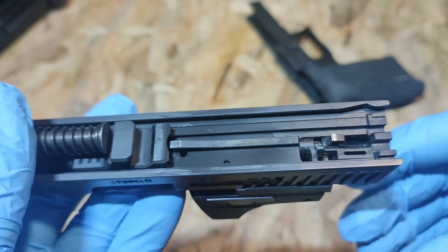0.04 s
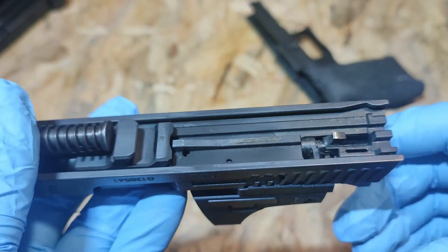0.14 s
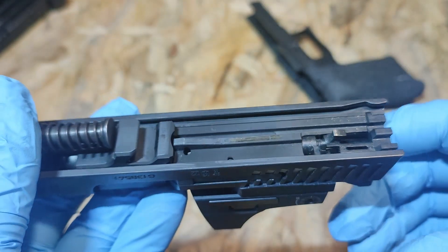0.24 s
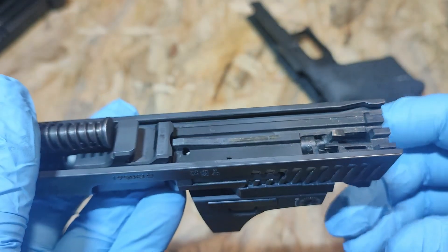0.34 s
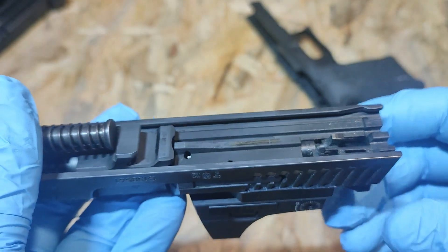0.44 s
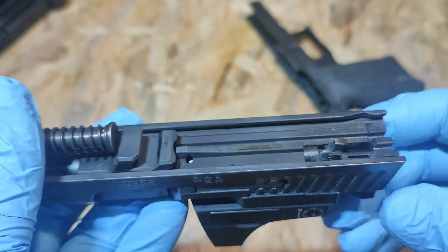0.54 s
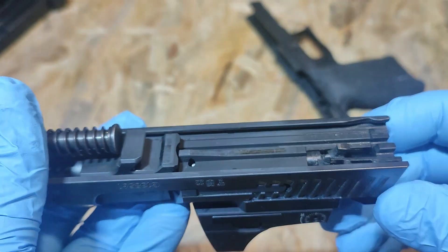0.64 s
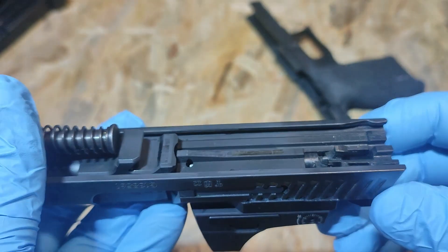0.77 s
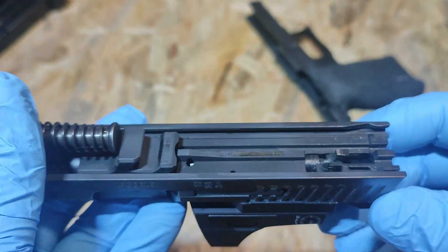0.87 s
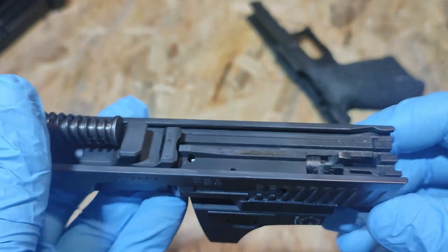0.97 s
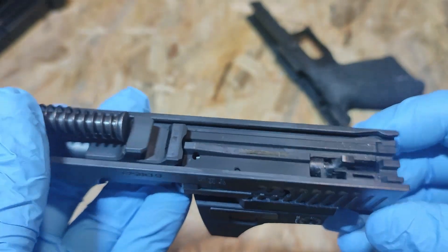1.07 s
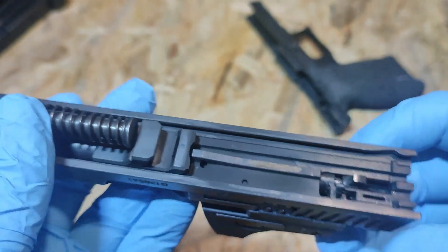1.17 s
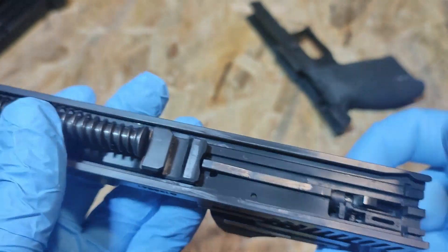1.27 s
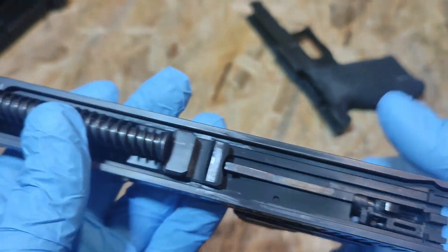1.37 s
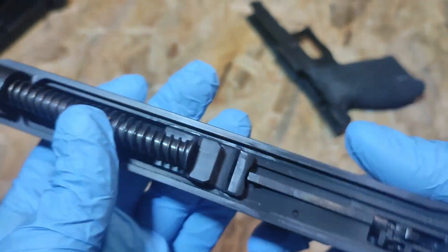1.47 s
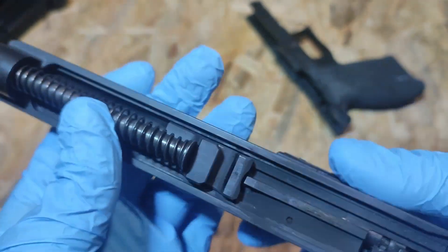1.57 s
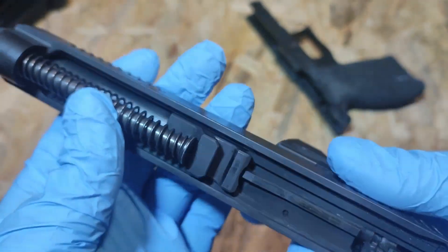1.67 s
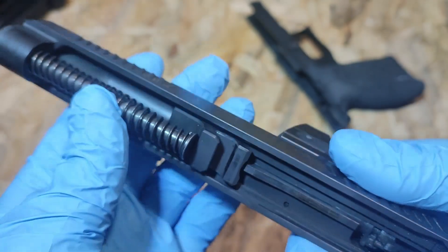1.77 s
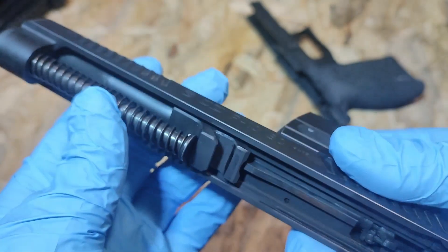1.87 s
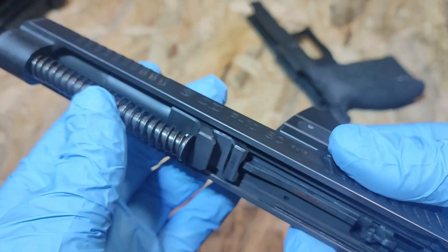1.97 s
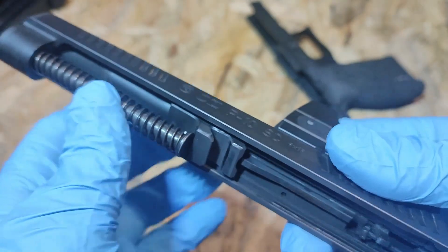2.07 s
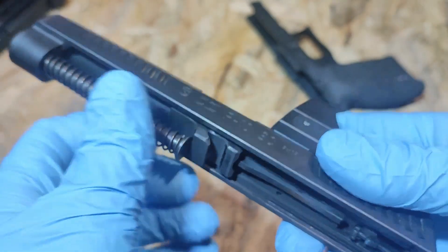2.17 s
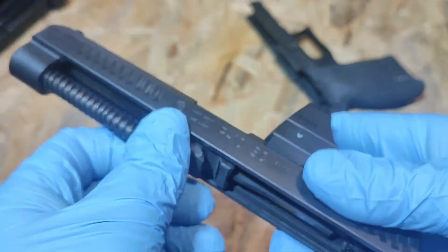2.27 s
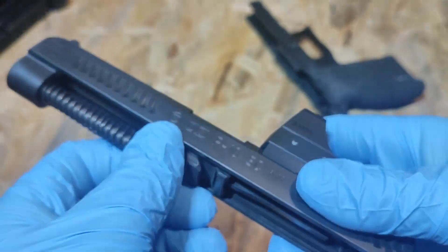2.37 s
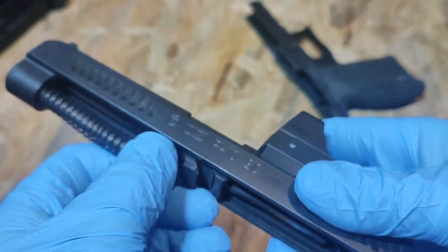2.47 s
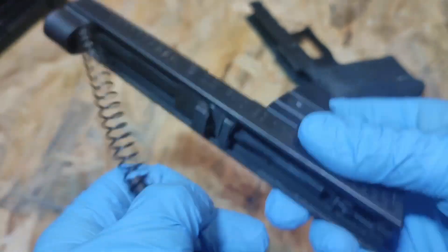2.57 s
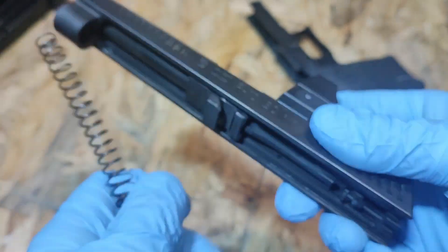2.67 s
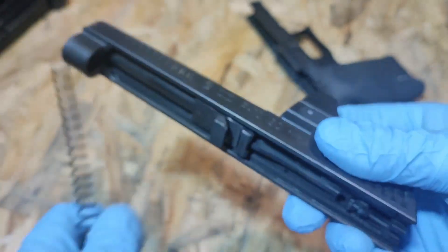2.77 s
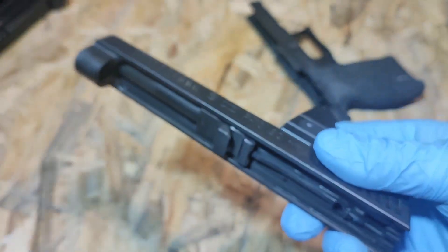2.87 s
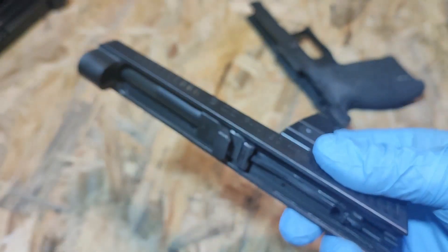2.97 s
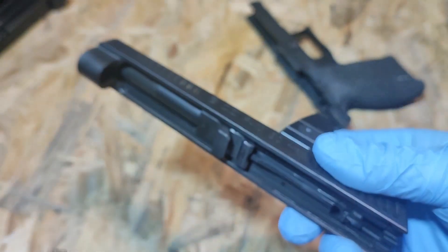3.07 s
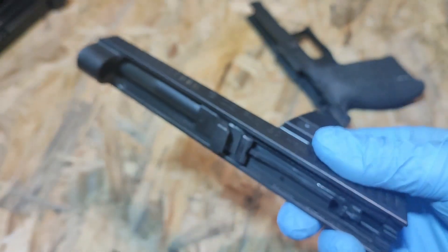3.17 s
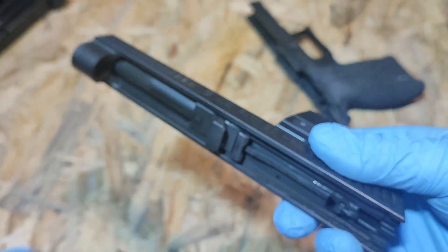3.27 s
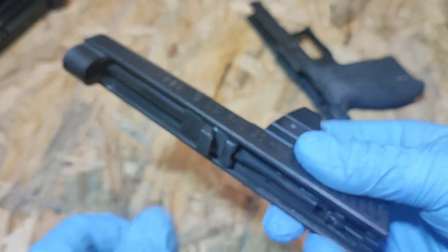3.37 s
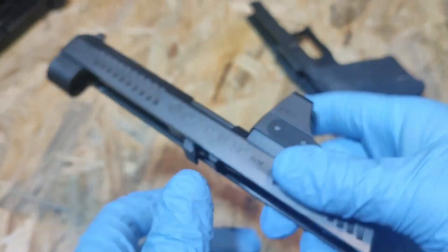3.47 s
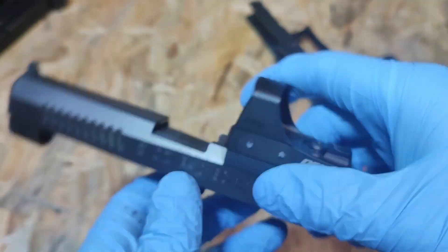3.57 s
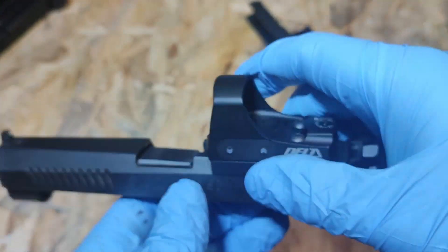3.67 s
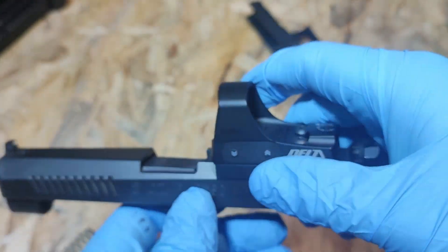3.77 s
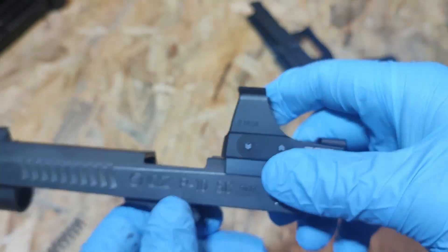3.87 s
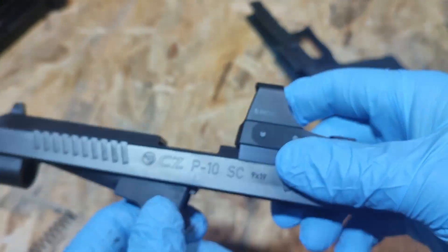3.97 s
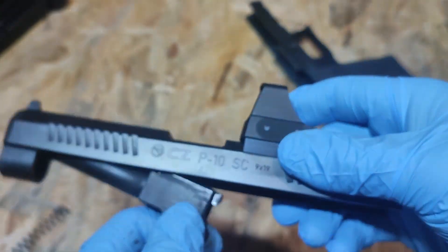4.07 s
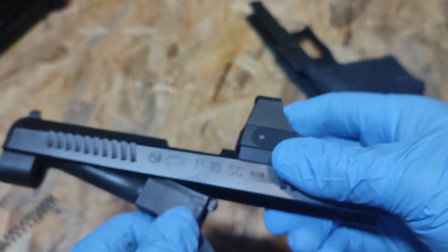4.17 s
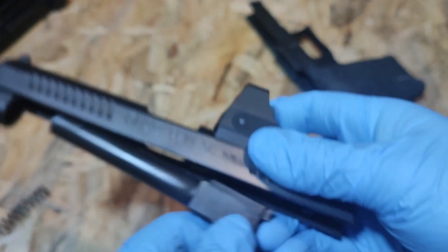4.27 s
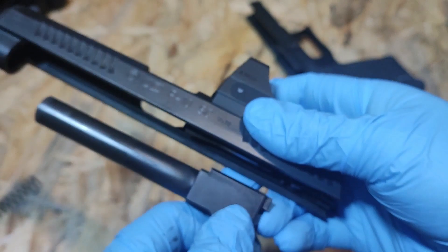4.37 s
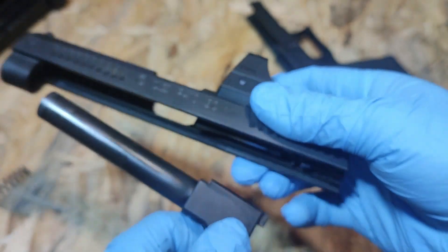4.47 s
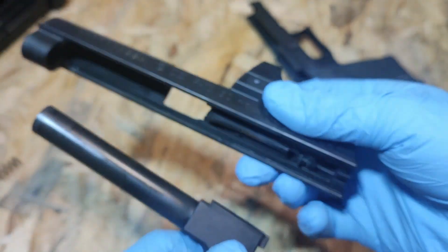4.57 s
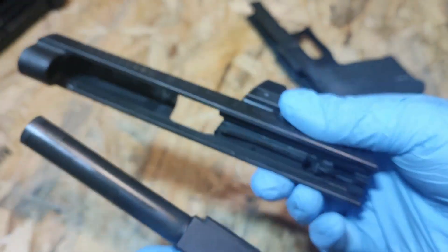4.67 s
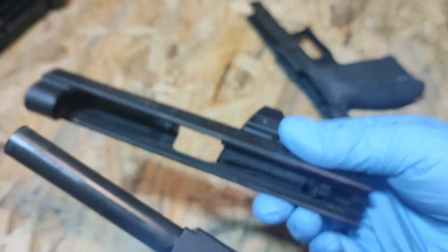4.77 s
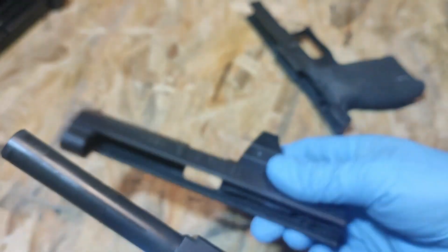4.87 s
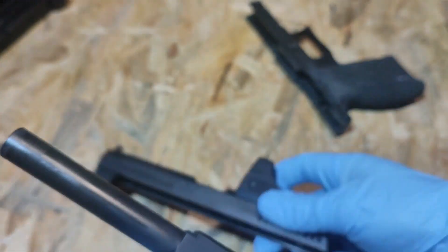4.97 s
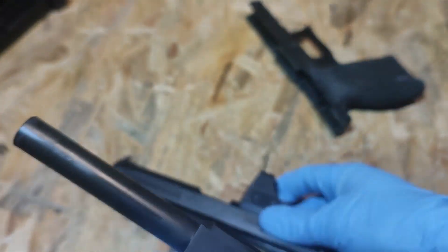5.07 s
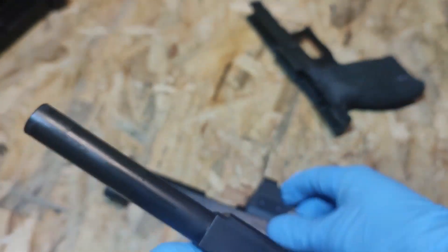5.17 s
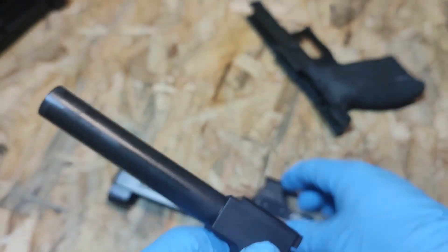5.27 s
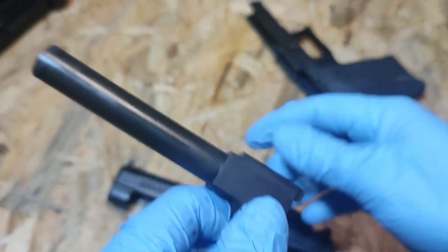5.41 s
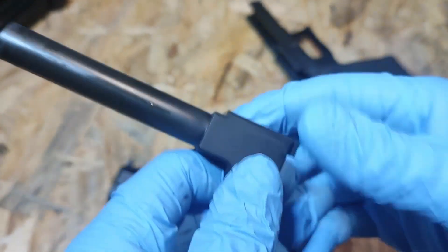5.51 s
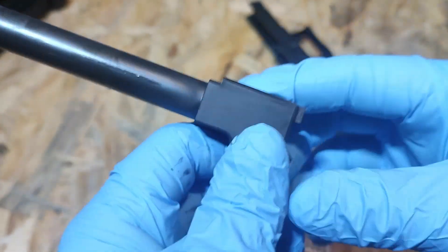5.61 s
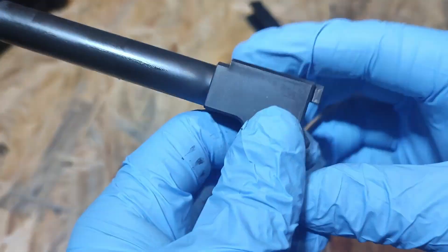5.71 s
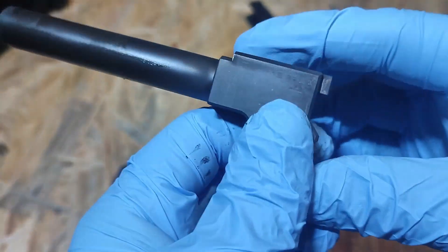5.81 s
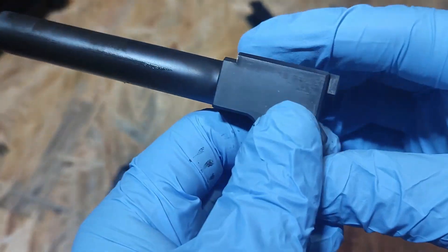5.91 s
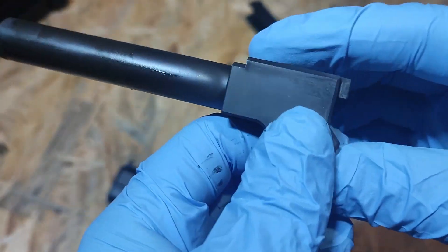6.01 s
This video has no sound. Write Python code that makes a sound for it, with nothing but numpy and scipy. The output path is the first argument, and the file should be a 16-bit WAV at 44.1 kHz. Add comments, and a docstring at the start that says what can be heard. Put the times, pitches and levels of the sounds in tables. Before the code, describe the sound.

Close stereo microphones in a small workshop with a low fan hum. Gloves rub faintly on steel; a spring snaps sharply with a deep thump, then a rod drops and bounces on a wooden board. A bright clink, small ticks and another clink follow as a tube is drawn out, cloth rustling softly. Finally a heavy metal part lands on the board with loud dull knocks and a brighter double knock.

```python
"""In a small workshop with a low steady hum, gloved hands strip a pistol slide close to two microphones.
The recoil spring snaps out and its rod is dropped on a chipboard bench; the barrel scrapes and clinks out of
the slide, and the slide is laid down with heavy knocks. Gloves rub on the steel and a sleeve rustles.
Blows are chattering noise bursts plus damped modes, each with a room echo; rubbing, scrape, rattle, rustle
and hum are coloured noise, the hum with a few wavering tones."""
import sys
import numpy as np
from scipy import signal
from scipy.fft import rfft, irfft, next_fast_len
from scipy.io import wavfile
from scipy.ndimage import uniform_filter1d, map_coordinates

SR = 44100
rng = np.random.default_rng(int(sys.argv[2]) if len(sys.argv) > 2 else 0)


def int16_out(signal):
    """Quantize to a 16-bit WAV file."""
    q = np.round(np.clip(np.atleast_2d(signal).T, -1, 1) * 32767)
    wavfile.write(sys.argv[1], SR, q.astype(np.int16))


N = 266522
AGE = np.arange(SR // 2) / SR  # time since a blow, s
TIME = np.arange(N) / SR

# The spring slips and snaps against the slide. Each row: start in seconds, level in dB, chatter t60 in seconds,
# brightness in dB per octave, spring ring in dB re the contact, left over right in dB.
SPRING_SNAPS = [(0.810, -43.5, 0.014, 1, -16, 3), (2.4287, -18, 0.031, 0, -8, -5),
                (2.5351, -29.5, .04, -1, -8, 7.5), (2.544, -20.5, .09, 0, -10, -2),
                (2.549, -18, .04, 2.5, -28, 7.5)]
# The barrel knocks inside the slide. Each row: start in seconds, level in dB, brightness in dB per octave,
# rings of slide, barrel and rails in dB re the contact, rebound in dB re the knock.
BARREL_CLINKS = [(2.382, -44, -1, -18, -20, -14, -25), (3.6196, -21, 9.5, -4, -45, -23, -12),
                 (3.707, -48, -1, -12, -21, -16, -10), (3.913, -40.5, 6, -12, 6, -10, -2),
                 (3.996, -50, 1, -8, 0.5, -14, -1), (4.068, -39.5, 3.5, -17, -24, -16, -1),
                 (4.228, -49, 1, -2, -8, -22, -5), (4.276, -21.5, -.5, -30, -7, -25, -8),
                 (4.328, -34.5, 6, -17, -1, 3.5, -18)]
# The slide lands on the bench. Each row: start in seconds, level in dB, brightness in dB per octave,
# loss a bounce in dB.
SLIDE_DROPS = [(5.057, -10.5, -6.5, 10.5), (5.222, -46, -13, 8.5), (5.324, -13, -.5, 30),
               (5.339, -16, 3, 32)]
# A glove grabs or lets go abruptly; at 5.059 loose steel rattles in the slide as it lands.
# Each row: loudest moment in seconds, level in dB, brightness in dB per octave.
GRIPS_AND_RATTLE = [(3.05, -47, -4), (3.168, -43.5, 1), (4.458, -52, 3), (4.673, -52, -4.5),
                    (4.805, -49, -4), (5.059, -40.5, -2.5)]
# A glove slides along the steel; at 3.607 the barrel scrapes just before its hard knock.
# Each row: loudest moment in seconds, level in dB, brightness in dB per octave.
STROKES_AND_SCRAPE = [(1.31, -66, 4), (1.53, -55.5, 6.5), (2.15, -62, 5.5), (2.235, -53, -0.5),
                      (2.665, -54.5, 2.5), (3.205, -48, 0), (3.478, -60, 5), (3.607, -57, -1),
                      (3.889, -62, 7), (4.06, -56, 2), (5.297, -55, 4)]

# Ringing modes of each part. Each row: frequency in Hz, typical strength in dB, t60 in seconds.
SPRING_MODES = [(3010, -6, .08), (3400, 1.5, 0.1), (3500, -0.5, .09), (4390, 4, 0.073), (5340, -3, .06),
                (5380, -1, 0.04), (7060, 1, 0.066), (7600, -5.5, 0.1), (8450, -7, .07),
                (10000, -12.5, 0.066), (10590, -8, 0.098), (12250, -9, .085), (13360, -4.5, 0.066)]
SLIDE_MODES = [(3180, -4, 0.072), (3760, -18, 0.02), (4430, 0, 0.096), (5130, 5, 0.075), (5200, -6, 0.07),
               (5620, -3.5, 0.067), (7240, -4, 0.086), (6850, -15, 0.091), (8410, -9, 0.065),
               (9130, -15, .07), (11400, -18, 0.079), (13360, -6, 0.12), (13600, -8, 0.087)]
BARREL_MODES = [(4363, -5, 0.25), (4340, -11, 0.14), (5140, -19, 0.044), (8700, -20, 0.09)]
RAIL_MODES = [(2930, 0, 0.093), (5020, -10, .04), (13650, -18, 0.073)]
ROD_MODES = [(5150, -6.5, 0.09), (10550, -3.5, 0.13)]
BOARD_MODES = [(69.45, -22, 0.5), (153.5, -4, 0.13), (167.9, 8, .13), (202, -6.5, 0.023),
               (271.8, -12, 0.33), (317.5, -12.5, .19), (423.7, -17, 0.22), (579, -7.5, 0.1),
               (739, -13, 0.038), (904, -16.5, .11), (1007, -16.5, 0.095), (1045, -19.5, 0.16)]

# Colours of the contacts and noises. Each row: frequency in Hz, relative density in dB per Hz.
SNAP_COLOUR = [(200, -16), (900, -18.5), (1700, -10), (2300, -10), (3300, -1), (4500, -0.5), (6200, -10),
               (7400, -2.5), (8600, -5.5), (9800, -13), (10700, -10), (12000, -13), (13500, -5.5),
               (15000, -22)]
CLINK_COLOUR = [(200, -23.5), (700, -26), (1050, -13.5), (1700, 0.5), (2400, -5), (3100, 1), (3550, 0),
                (3850, -2.5), (4700, -10), (6200, -16), (7300, -14.5), (8800, -20.5), (9700, -30.5),
                (11500, -26), (12700, -31), (13800, -23.5)]
ROD_KNOCK_COLOUR = [(50, -22), (150, -3), (280, 4), (380, -6.5), (500, -15), (780, -12.5), (1000, -1.5),
                    (1300, -2), (1800, -6), (3200, -8.5), (4100, -28.5), (5300, -20), (8500, -32),
                    (14000, -39.5)]
SLIDE_KNOCK_COLOUR = [(40, -26.5), (100, -6.5), (170, 7.5), (280, 3), (450, -1.5), (900, 3), (1500, -7),
                      (2400, -8), (3700, -21.5), (6800, -28), (10000, -44), (14000, -53)]
RUB_COLOUR = [(200, -8), (1000, -1.5), (3000, 1), (7500, 1.5), (10000, -10), (13500, -4), (15000, -10.5)]
SLEEVE_COLOUR = [(50, -19), (110, -15.5), (165, -1), (300, -4), (600, -16.5), (1200, -21.5), (3000, -31),
                 (8000, -52)]
HUM_COLOUR = [(12, -31.5), (20, 2), (33, -13.5), (66, -8.5), (105, -1), (143, -9), (263, -18), (409, -14),
              (540, -22), (865, -19.5), (1170, -25), (3090, -30), (4200, -37), (13400, -46.5),
              (15000, -52.5)]

# Wavering tones in the hum. Each row: frequency in Hz, level in dB.
HUM_LINES = [(97, -74.5), (350, -80), (409, -79), (888, -83.5), (1077, -82.5)]
# Likeness of diffuse sound at the two microphones. Each row: frequency in Hz, correlation from 0 to 1.
ALIKE = [(60, 0.65), (130, 1), (290, 0.47), (630, 0.59), (1390, 0.09), (6700, 0.01)]
# Decay of the workshop's echo. Each row: frequency in Hz, t60 in seconds.
ROOM = [(100, 0.34), (400, 0.24), (1500, 0.15), (6000, 0.12), (14000, 0.16)]

SHRINK = .53  # every bounce flies this share of the one before
TIP_LEAD_S, TIP_DB = .003, -20  # an edge touches just ahead of each blow of spring and rod; dB re that blow
COIL_S, COIL_DB, COIL_FLIGHT_S, COIL_LOSS_DB = 2.6896, -40, .04, 8  # start, level, first flight, loss a bounce
CLINK_T60_S, REBOUND_T60_S = .04, .065  # chatter after a knock and after its rebound
REBOUND_S, REBOUND_TILT = .012, -2.5  # crossing to the opposite wall; brightness there, dB per octave
ROD_S, ROD_DB, ROD_FLIGHT_S, ROD_LOSS_DB = 3.2273, -14.3, .0644, 6.3  # start, level, first flight, loss a bounce
ROD_SETTLING_DB = 2  # extra loss, times k * (k - 1) at bounce k
ROD_CHATTER_S, ROD_CHATTER_GROWS = 0.027, 2  # t60 of the first contact; factor for each later one
SLIDE_FLIGHT_S, SLIDE_DULLING = .044, 3.5  # first flight; brightness lost a bounce, dB per octave
BOARD_DB, BOARD_PER_DB = -7, -.6  # ring of the board; duller blows ring it more (dB per dB per octave)
GRIP_RISE_S, GRIP_FADE_S = .0025, 0.13  # time constant of the rise, t60 of the fade
STROKE_RISE_S, STROKE_FADE_S = .033, 0.16  # likewise
FIDGET_DB, FIDGET_SWING_DB = -79, 3.5  # faint rubbing of the fingers all along
ARM_FROM_S, ARM_TO_S, ARM_DB = 3.95, 4.7, -58.5  # the sleeve rustles while the arm draws out the barrel
ARM_RISE_DB_PER_S, ARM_FALL_DB_PER_S = 13, 36
TOP_HZ = 14250  # upper band limit


def spring():
    """The compressed spring slips off its seat and rattles along the slide; its slack end ticks to rest."""
    out = np.zeros((2, N))
    for s, db, t60, tilt, ring_db, pan_db in SPRING_SNAPS:
        edge = contact(SNAP_COLOUR, t60=.016, tilt=-2.5, crack_db=-17.5, rise=.0008)
        add(out, s - TIP_LEAD_S, amp(db + TIP_DB) * edge, room_db=-21.5)
        snap = contact(SNAP_COLOUR, t60, tilt, crack_db=-18.0, rise=.0008)
        snap += amp(ring_db) * ring(SPRING_MODES, spread=4.4)
        add(out, s, amp(db) * snap, room_db=-21.5, pan_db=pan_db)
    for _, s, db in bounces(COIL_S, COIL_DB, COIL_FLIGHT_S, COIL_LOSS_DB, count=4):
        tick = contact(SNAP_COLOUR, t60=0.018, tilt=11.5, crack_db=-15.0, rise=.0008)
        tick += amp(-17) * ring(SPRING_MODES, spread=3.0)
        add(out, s, amp(db) * tick, room_db=-17, pan_db=0.5)
    return out


def barrel():
    """The barrel strikes one wall and rebounds on the other; barrel, slide and its thin rails ring."""
    out = np.zeros((2, N))
    for s, db, tilt, slide_db, barrel_db, rail_db, rebound_db in BARREL_CLINKS:
        clink = contact(CLINK_COLOUR, CLINK_T60_S, tilt, crack_db=-19.0, rise=0.0011)
        for modes, ring_db in (SLIDE_MODES, slide_db), (BARREL_MODES, barrel_db), (RAIL_MODES, rail_db):
            clink += amp(ring_db) * ring(modes, spread=0.87)
        add(out, s, amp(db) * clink, room_db=-19.5, pan_db=2.5)
        rebound = contact(CLINK_COLOUR, REBOUND_T60_S, REBOUND_TILT, crack_db=-22.5, rise=0.00092)
        for modes, ring_db in (SLIDE_MODES, -4), (RAIL_MODES, -14):
            rebound += amp(ring_db) * ring(modes, spread=1.0)
        add(out, s + REBOUND_S, amp(db + rebound_db) * rebound, room_db=-18, pan_db=-3.5)
    return out


def bench():
    """The light rod bounces on the board; the heavy slide lands on one end, rocks, then falls flat."""
    out = np.zeros((2, N))
    for k, s, db in bounces(ROD_S, ROD_DB, ROD_FLIGHT_S, ROD_LOSS_DB, count=3):
        db = db - ROD_SETTLING_DB * k * (k - 1)
        tip = contact(ROD_KNOCK_COLOUR, t60=0.018, tilt=-1, crack_db=-1.5, rise=.0003)
        add(out, s - TIP_LEAD_S, amp(db + TIP_DB) * tip, room_db=-14.5)
        chatter_s = ROD_CHATTER_S * ROD_CHATTER_GROWS ** k
        knock = contact(ROD_KNOCK_COLOUR, chatter_s, tilt=-.6, crack_db=-2, rise=0.00015)
        knock += amp(-18) * ring(BOARD_MODES, spread=.8)
        knock += amp(-27) * ring(ROD_MODES, spread=.9)
        add(out, s, amp(db) * knock, room_db=-14.5)
    for start, first_db, tilt, loss_db in SLIDE_DROPS:
        for k, s, db in bounces(start, first_db, SLIDE_FLIGHT_S, loss_db, count=3):
            bright = tilt - SLIDE_DULLING * k
            knock = contact(SLIDE_KNOCK_COLOUR, t60=0.059, tilt=bright, crack_db=-4, rise=0.00017)
            knock += amp(BOARD_DB + BOARD_PER_DB * bright) * ring(BOARD_MODES, spread=.8)
            add(out, s, amp(db) * knock, room_db=-14.5)
    return out


def thump():
    """A deep push and, a tenth of a second later, its softer return in the left microphone only."""
    def push(s, rise, life):
        """A pressure pulse with exponential rise and decay, time constants in seconds."""
        age = np.maximum(TIME - s, 0)
        return (1 - np.exp(-age / rise)) * np.exp(-age / life)
    first_push = -amp(-17) * push(2.4295, rise=.0002, life=.021)
    softer_return = amp(-27) * push(2.526, rise=.002, life=.1)
    return np.array([first_push + softer_return, np.zeros(N)])


def rubbing():
    """Gloves grip or slide along the steel, fingers never quite still; one barrel scrape, one steel rattle."""
    fidget = map_coordinates(rng.standard_normal(64), [TIME * 7], mode="mirror")  # 7 chance levels a second
    faint_rub = unit(coloured(diffuse(N), RUB_COLOUR, tilt=1.9))
    out = amp(FIDGET_DB + FIDGET_SWING_DB * fidget) * faint_rub
    abrupt = GRIPS_AND_RATTLE, GRIP_RISE_S, GRIP_FADE_S
    sliding = STROKES_AND_SCRAPE, STROKE_RISE_S, STROKE_FADE_S
    for moves, rise, t60 in abrupt, sliding:
        for s, db, tilt in moves:
            add(out, s - AGE.mean(), amp(db) * grains(rise, t60, tilt), room_db=-8)
    return out


def sleeve():
    """A low rustle of cloth swells, holds and fades with one movement of the arm."""
    rise_db = ARM_RISE_DB_PER_S * np.maximum(ARM_FROM_S - TIME, 0)
    fall_db = ARM_FALL_DB_PER_S * np.maximum(TIME - ARM_TO_S, 0)
    return amp(ARM_DB - rise_db - fall_db) * unit(coloured(diffuse(N), SLEEVE_COLOUR))


def hum():
    """A fan's steady rush with a few tones of wavering phase."""
    out = amp(-60.0) * unit(coloured(diffuse(N), HUM_COLOUR))
    for hz, db in HUM_LINES:
        drift = map_coordinates(rng.standard_normal(64), [TIME * 6], mode="mirror")
        out += amp(db) * np.sqrt(2) * np.sin(2 * np.pi * hz * TIME + 0.58 * drift)
    return out


def contact(spectrum, t60, tilt, crack_db, rise):
    """One sharp impact and the dense chatter that follows it; each contact has its own resonances."""
    chatter = diffuse(len(AGE)) * amp(-60 * AGE / t60) * (1 - np.exp(-AGE / rise))
    highpass = signal.butter(1, 350, "high", fs=SR)
    force = blow(signal.lfilter(*highpass, chatter))
    force[:, 0] += amp(crack_db) * np.linalg.norm(force[0])  # the bass comes from the impact itself
    return blow(coloured(force, spectrum, tilt, ripple_db=3.8))


def ring(modes, spread):
    """Damped modes at new strengths; spread is the phase scatter between the microphones, in radians."""
    hz, db, t60 = np.transpose(modes)[:, :, None]
    strength_db = 2 * rng.standard_normal(hz.shape)
    phase = spread * np.minimum(hz / 1200, 1) ** 2 * rng.standard_normal((2, *hz.shape))
    sign = (-1) ** np.arange(len(modes))[:, None]  # neighbouring modes swing in opposite directions
    decay = amp(db + strength_db - 60 * AGE / t60)
    waves = sign * decay * np.sin(2 * np.pi * hz * AGE + phase)
    return blow(waves.sum(axis=1) * (1 - np.exp(-AGE / .0007)))


def grains(rise, t60, tilt):
    """Noise in tiny grains, as of surfaces slipping, loudest in the middle of its span."""
    since = AGE - AGE.mean()
    slips = amp(3 * unit(uniform_filter1d(rng.standard_normal(len(AGE)), size=60)))  # rms swing 3 dB
    stroke = np.exp(np.minimum(since, 0) / rise) * amp(-60 * np.maximum(since, 0) / t60)
    return stroke * unit(coloured(slips * diffuse(len(AGE)), RUB_COLOUR, tilt))


def bounces(s, db, flight, loss_db, count):
    """(number, time, level) of contacts that come ever faster and softer."""
    return [(k, s + flight * np.sum(SHRINK ** np.arange(k)), db - loss_db * k) for k in range(count)]


def add(track, s, sound, room_db, pan_db=0):
    """Place a sound at time s together with the room's answer, a diffuse tail that dies by frequency."""
    hz, t, z = signal.stft(diffuse(len(AGE)), SR, nperseg=256)
    decay = amp(-60 * t / along(ROOM, hz)[:, None])
    tail = signal.istft(z * decay, SR, nperseg=256)[1]
    tail *= 1 - np.exp(-np.arange(tail.shape[1]) / SR / 0.016)  # reflections build up
    echo = signal.fftconvolve(sound, tail / np.linalg.norm(tail[0]), axes=1)[:, :len(AGE)]
    pan = amp([[pan_db / 2], [-pan_db / 2]])
    slot = track[:, round(s * SR):][:, :len(AGE)]
    slot += ((sound + amp(room_db) * echo) * pan)[:, :slot.shape[1]]


def diffuse(size):
    """White stereo noise, alike in the bass and unrelated in the treble, as at two spaced microphones."""
    likeness = along(ALIKE, np.fft.rfftfreq(size, 1 / SR))
    turn = np.arccos(np.clip(likeness, -1, 1)) / 2
    mid, side = irfft(rfft(rng.standard_normal((2, size))) * [np.cos(turn), np.sin(turn)], size)
    return np.array([mid + side, mid - side])


def coloured(x, spectrum, tilt=0, ripple_db=0):
    """Causal filter: a spectrum, a tilt in dB per octave above 200 Hz, chance resonances in the treble."""
    size = next_fast_len(x.shape[-1] + 8192)
    hz = np.fft.rfftfreq(size, 1 / SR)
    gain_db = along(spectrum, hz) + tilt * np.log2(np.maximum(hz, 200))
    peaks = map_coordinates(rng.standard_normal(160), [hz / 140], mode="mirror")  # one every 140 Hz
    gain_db += ripple_db * peaks * hz / (hz + 1500)
    # folding the cepstrum makes the filter minimum-phase
    cepstrum = irfft(np.log(amp(gain_db)), size)
    cepstrum[1:size // 2] *= 2
    cepstrum[size // 2 + 1:] = 0
    return irfft(rfft(x, size) * np.exp(rfft(cepstrum)), size)[..., :x.shape[-1]]


def along(points, hz):
    """Interpolate (Hz, value) points on a log frequency axis."""
    f, v = np.transpose(points)
    return np.interp(np.log(hz + 1), np.log(f), v)


def blow(x):
    """Scale to the energy of 10 ms at rms 1."""
    return unit(x) * np.sqrt(.01 * SR / x.shape[-1])


def unit(x):
    """Scale to rms 1."""
    return x / np.sqrt(np.mean(x ** 2) + 1e-20)


def amp(db):
    """Decibels to gain."""
    return 10 ** (np.asarray(db) / 20)


def scene():
    """All sources together, from the main one to the background."""
    return spring() + barrel() + bench() + thump() + rubbing() + sleeve() + hum()


def record(dry):
    """Two treble bands peak in the left microphone port and dip in the right; a steep cut ends the band."""
    size = next_fast_len(N + 8192)
    hz = np.fft.rfftfreq(size, 1 / SR)

    def port(centre_hz, width_hz, db):
        """A bell-shaped peak or dip in dB."""
        return db * np.exp(-((hz - centre_hz) / width_hz) ** 2)

    left_db = port(8600, 500, db=5) + port(13600, 600, db=0.5)
    right_db = port(8700, 700, db=-5) + port(13400, 900, db=-3)
    cut = 1 / np.sqrt(1 + (hz / TOP_HZ) ** 140)
    return irfft(rfft(dry, size) * amp([left_db, right_db]) * cut, size)[:, :N]


dry = scene()
out = record(dry)
int16_out(out)
```